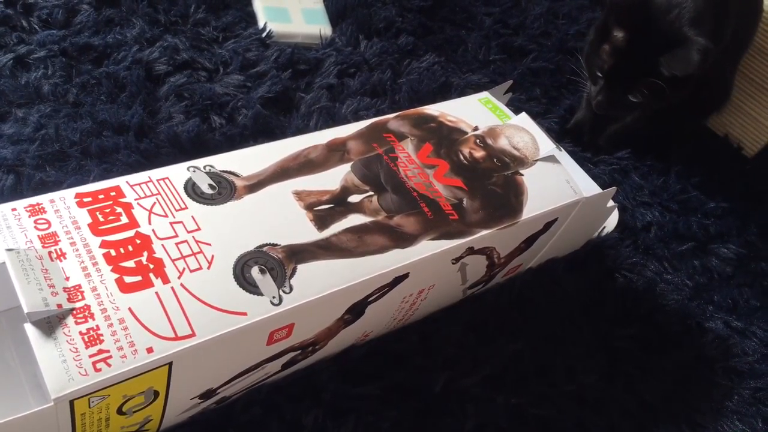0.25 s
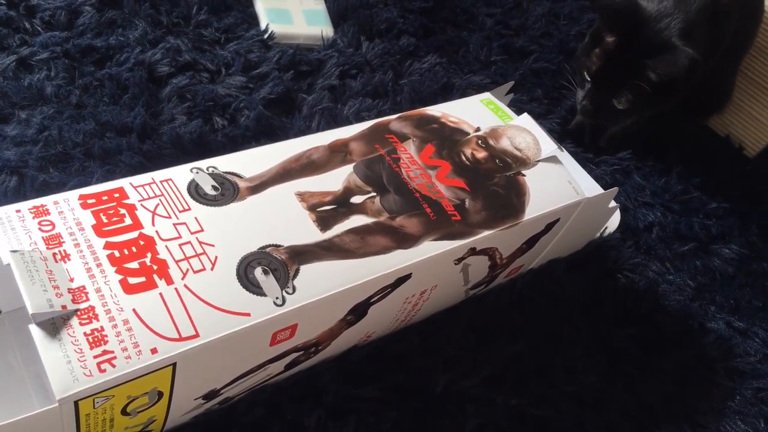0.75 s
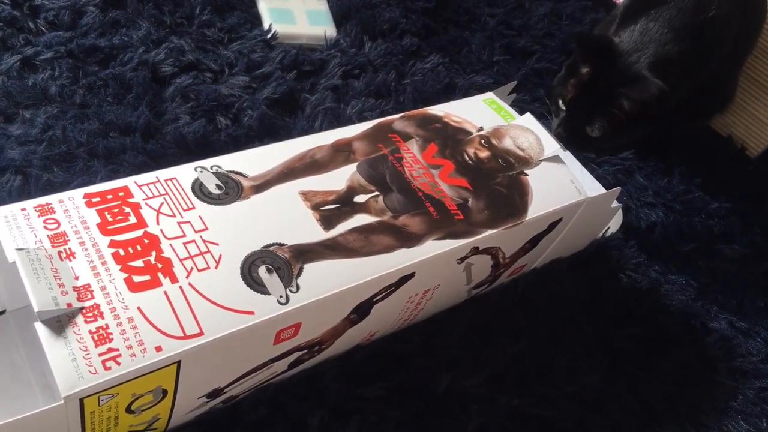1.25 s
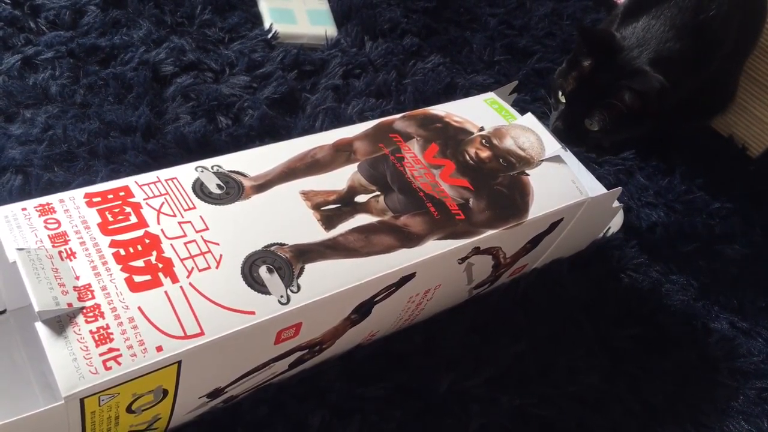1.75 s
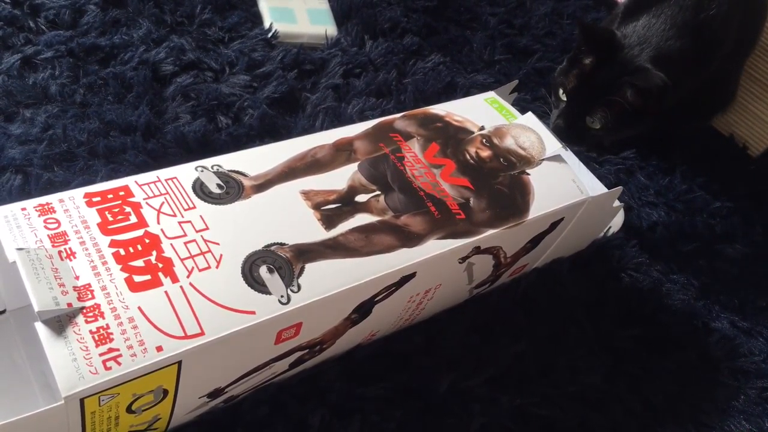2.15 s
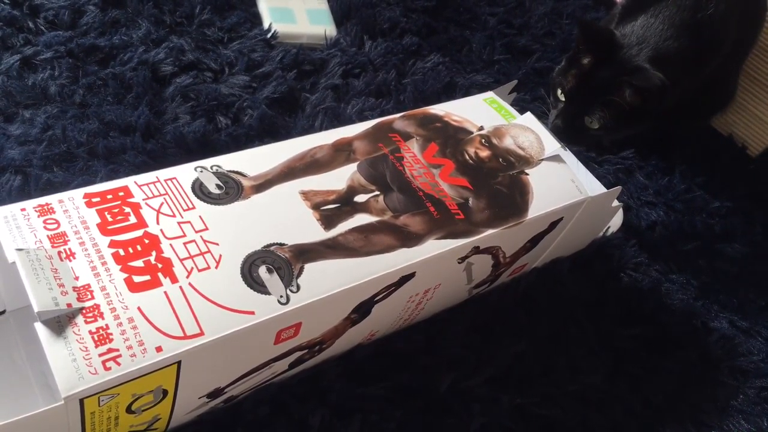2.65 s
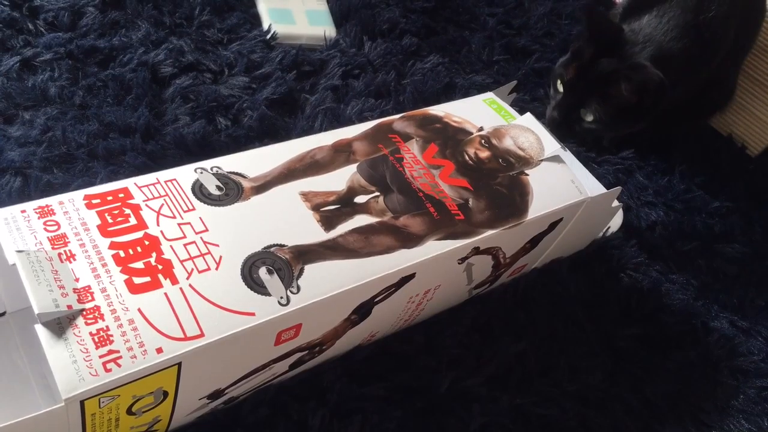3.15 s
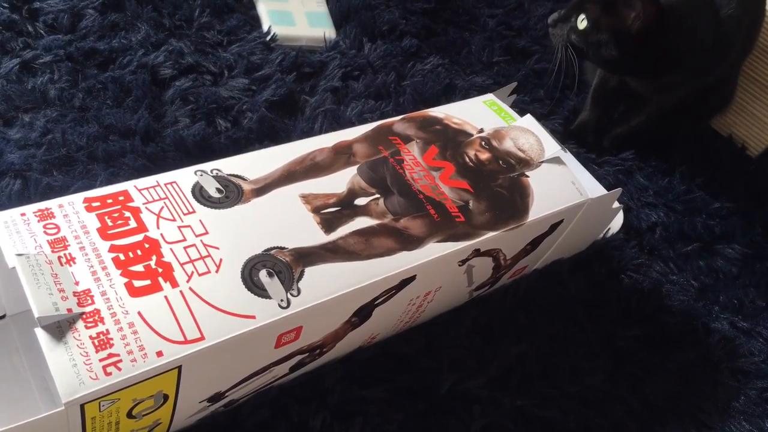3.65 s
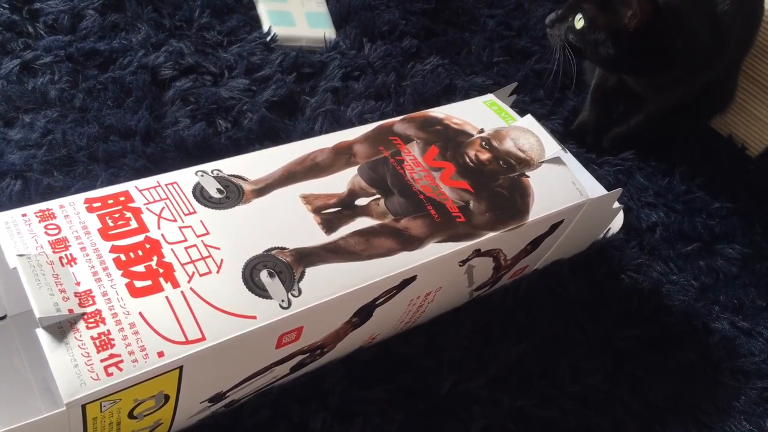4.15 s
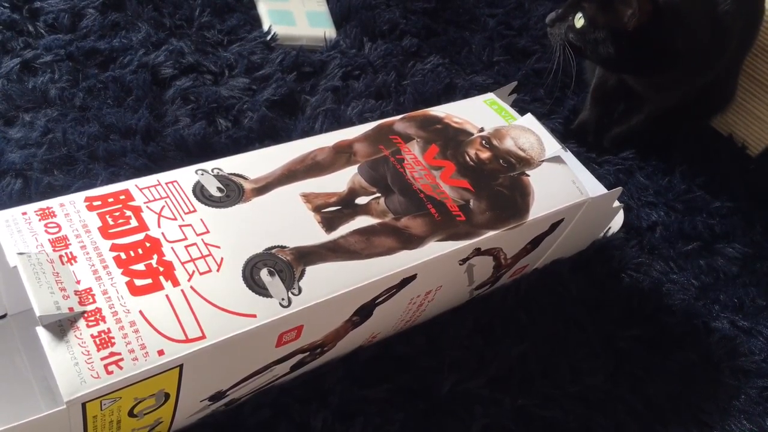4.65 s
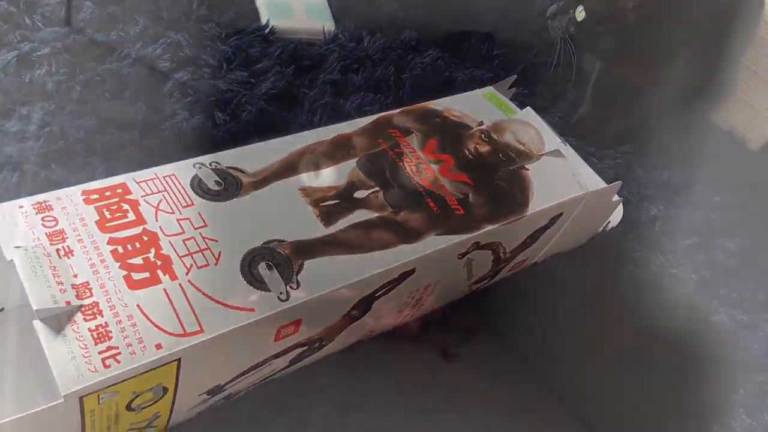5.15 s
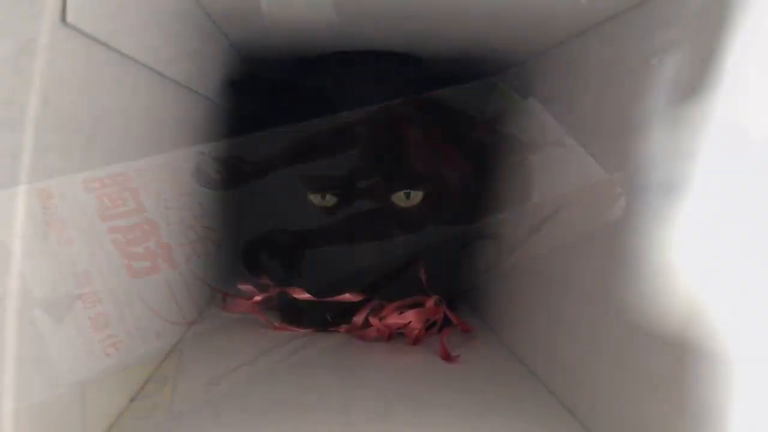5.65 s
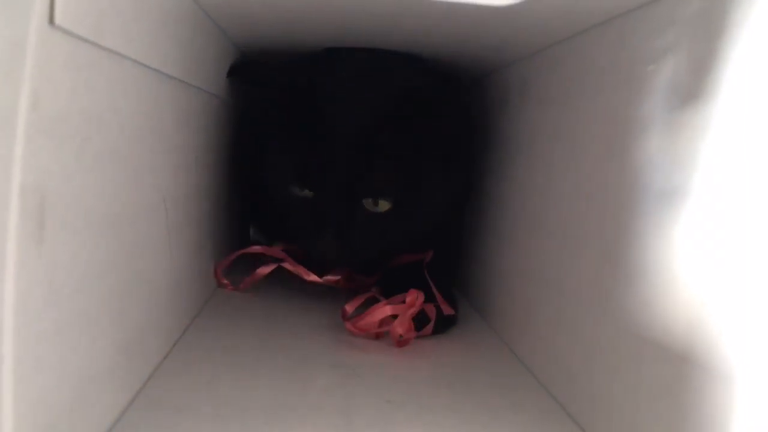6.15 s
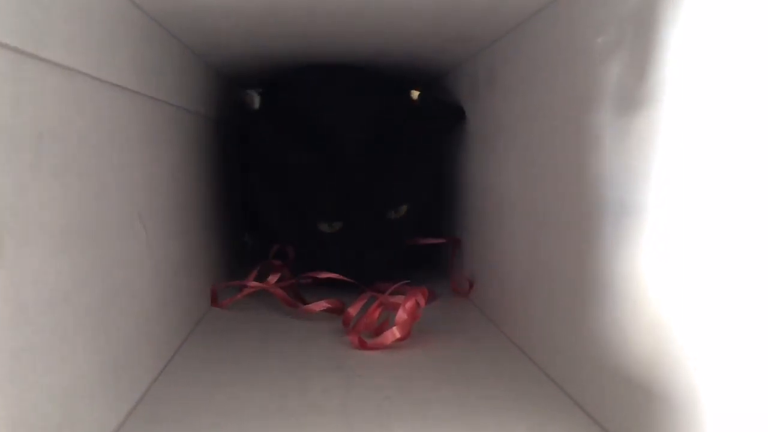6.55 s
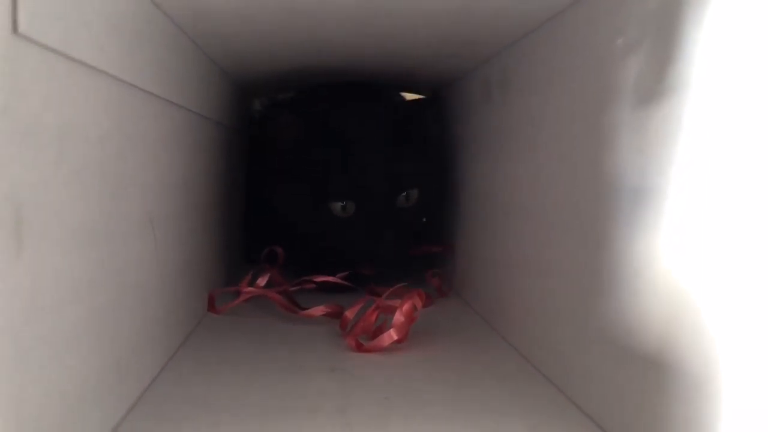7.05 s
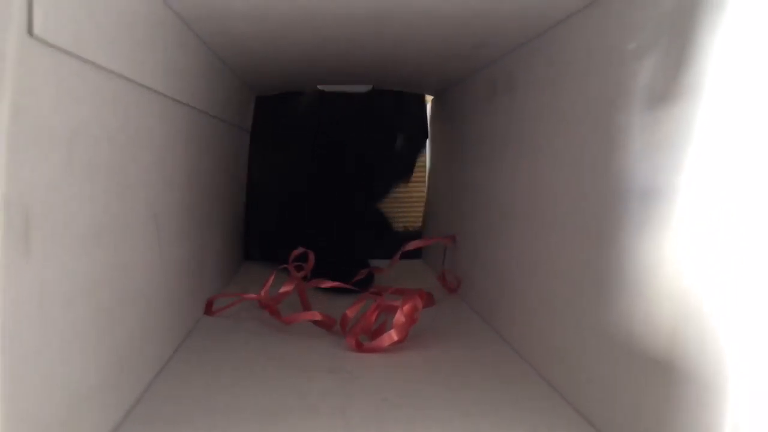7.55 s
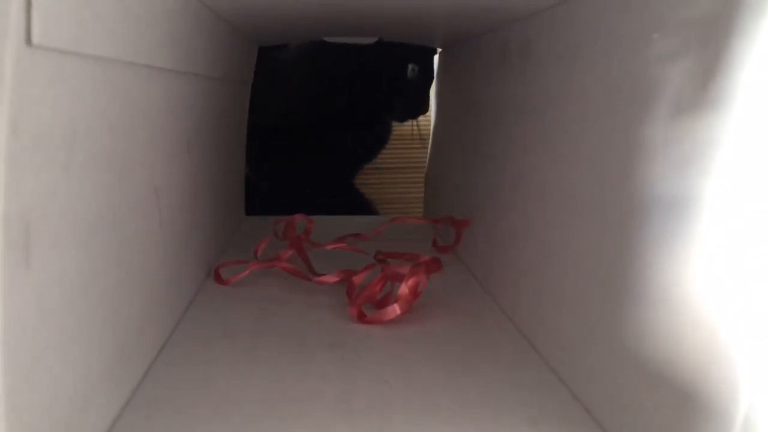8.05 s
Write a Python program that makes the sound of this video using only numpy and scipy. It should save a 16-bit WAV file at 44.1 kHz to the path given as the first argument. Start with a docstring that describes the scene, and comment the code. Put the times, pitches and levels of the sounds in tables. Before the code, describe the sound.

A quiet room has a steady low rumble and faint hiss. A cat picks at a cardboard flap with light, dry claw ticks and tiny scrapes, several between 0.4 and 1.3 seconds, then single ones near 2.4, 2.8, 3.5 and 4.3 seconds, the sharpest at 3.5. At about 4.8 seconds a soft bump brings in a hollow, booming rumble, as the microphone now listens from inside the box; a low wavering hum soon joins. From about 5.5 seconds fur rubs along the walls in close, uneven swells, with ribbon crinkles, small snaps and brief rasping scratches. The box rocks with two low thuds around 6.2 seconds, then a knock and another thud around 7.2; these are the loudest moments. A quick run of sharp snaps follows from 7.6 to 7.8 seconds as the cat backs out. The rubbing stops, and the rumble lingers until about 8.3 seconds.

```python
"""A cat and a cardboard box

In a quiet room, a cat picks at the flap of a long box: dry ticks and short claw scrapes.
Then we listen from inside the box, where the air booms. The cat pushes its head in, rubs its fur
along the walls, bumps them, crinkles a ribbon and backs out with a few sharp snaps."""
import sys
import numpy as np
from scipy import signal
from scipy.fft import rfft, irfft, next_fast_len
from scipy.io import wavfile
from scipy.ndimage import uniform_filter1d

SR = 44100
rng = np.random.default_rng(int(sys.argv[2]) if len(sys.argv) > 2 else 0)


def unload_wav(signal):
    """Save mono or channel-first audio to the path in sys.argv[1] as 16-bit WAV at rate SR, clipped to [-1, 1]."""
    wavfile.write(
        sys.argv[1],
        SR,
        np.round(np.clip(np.atleast_2d(signal).T, -1, 1) * 32767).astype(np.int16),
    )


N = 366030
TIME = np.arange(N) / SR

# The tone of a claw slipping on the flap: pitch_hz, level_db
CLAW_TONE = [(150, -27), (700, -4), (1100, 0), (1400, -7.5), (1800, -0.5), (2600, 3.5), (3000, -10.5),
             (3700, -3.5), (5100, -17), (6300, -14), (8700, -18), (10400, -29), (11500, -22.5),
             (17000, -51)]
# The notes of the flap and the wall: pitch_hz, level_db, ring_s (time to fade by 60 dB)
FLAP_NOTES = [(1724, 6, 0.026), (2440, 2.5, 0.013), (3330, 1.5, 0.028), (6300, 5, .007)]
WALL_NOTES = [(77.4, -4.5, .14), (130.7, 5, 0.07), (260, -2, 0.064), (352, 1.5, 0.069), (685, -0.5, 0.044),
              (809, -2.5, 0.049), (1165, 0.5, 0.03), (1636, -3, 0.032), (2460, -27, 0.048),
              (3430, -21, 0.087)]
# Plucks at the flap: start_s, level_db, skid_ms, slip_ms, brightness_db_per_octave, spot_pitch_hz
PLUCKS = [(.441, -56.5, 1.5, 4, -7, 2540), (.520, -58, 32.5, 2, 0.5, 1860),
          (0.79, -59.5, -1.5, 1.4, -4, 1660), (.843, -42.5, 8.5, 2.8, -0.5, 1740),
          (.856, -54, -1, 1.4, 4, 3400), (1.106, -51, 0, 7, 3, 3430), (1.1438, -47.5, 3.5, 2.2, 2, 1830),
          (1.2538, -44.5, 5, 5.6, 2, 1765), (1.261, -45.5, -2, 1.9, -2.5, 1900),
          (1.270, -57, 0, 1.5, 3, 6450), (2.3918, -45.5, 6, 1.1, 4.5, 6700),
          (2.805, -59, 22, 3.2, 0.5, 2510), (3.489, -53.5, -1, 1.5, -8, 1200),
          (3.5442, -38, 1, 3.1, -0.5, 4300), (4.2655, -48.5, 1, 4.7, -2, 2590),
          (4.8091, -46.5, 1, 1.8, 0.5, 6360), (5.018, -55, 2, 3.2, 5, 3320),
          (5.236, -48.5, 1.5, 6, 2.5, 2500)]

def claw_plucks():
    """A claw may skid first, then lets go of the flap, which rings and shakes the wall."""
    out = np.zeros(N)
    for start_s, db, skid_ms, slip_ms, brightness, spot_hz in PLUCKS:
        if skid_ms > 0:
            add(out, start_s - skid_ms / 1000, slip(CLAW_TONE, db - 7, skid_ms, brightness))
        add(out, start_s, slip(CLAW_TONE, db, slip_ms, brightness))
        # Notes near the pitch of the plucked spot ring loudest.
        flap = [(hz, db + level - 35 * abs(np.log2(hz / spot_hz)), ring_s)
                for hz, level, ring_s in FLAP_NOTES]
        add(out, start_s, ring(flap, rise_s=0.00012))
        nudges = rng.standard_normal((len(WALL_NOTES), 2))
        wall = [(hz * (1 + 0.019 * pitch_nudge), level + 1.54 * level_nudge, ring_s)
                for (hz, level, ring_s), (pitch_nudge, level_nudge) in zip(WALL_NOTES, nudges)]
        push_db = min(db + 0.5, -44)  # the push on the wall grows until the flap gives way
        add(out, start_s, gain_of(push_db) * ring(wall, rise_s=0.0029))
    return out + gain_of(-14.5) * echoes(out, delay_s=0.008, length_ratio=0.85)


# The tone of a snap or crinkle: pitch_hz, level_db
SNAP_TONE = [(200, -14), (1000, -1), (1500, 0.5), (2400, 6), (4000, 7.5), (5100, 3), (6200, 4), (7500, -2),
             (9000, -4.5), (10400, -12), (12000, -9), (17000, -18)]
# Claw snaps and ribbon crinkles inside the box: start_s, level_db, slip_ms, brightness_db_per_octave
SNAPS = [(5.481, -58, 1.8, 15), (5.562, -48, 3.3, -14), (5.634, -57, 4.4, 9), (5.86, -49, 2.8, 4.5),
         (5.877, -47, 1.8, 3), (5.952, -45.5, 5.6, 11), (5.9844, -37, 1.2, 9), (6, -44.5, 4.2, -10),
         (6.071, -49, 2, 11), (6.2029, -40, 3.4, -3), (6.354, -43.5, 5.8, -5), (6.365, -46, 4.5, 10),
         (6.6282, -46, 5.3, -7.5), (7.165, -52.5, 4.7, 0), (7.182, -55, 5, 0), (7.4981, -45.5, 6.1, -7),
         (7.654, -39.5, 4.2, -4), (7.6933, -39, 1.8, 9), (7.701, -39.5, 3.4, -6), (7.7503, -40, 1.6, -0.5),
         (7.7572, -40, 1.7, 0.5), (7.791, -36, 1.3, -2.5), (7.819, -49.5, 1, -3)]
# The notes of one cardboard panel: pitch_ratio, level_db, ring_ratio
PANEL_NOTES = [(.5, 1, .8), (.87, 2.5, 0.89), (1.08, 9.5, 0.52), (1.6, -6.5, 0.77), (2.7, -9, 0.32)]
# Paw knocks on a panel: start_s, level_db, pitch_hz, ring_s
KNOCKS = [(4.766, -39, 404, 0.016), (6.2043, -42.5, 580, 0.051), (7.1233, -27.5, 389, 0.041),
          (7.749, -35.5, 997, 0.051)]

def snaps_and_knocks():
    """Claws snap, ribbon crinkles and paws knock close by; the box answers with a short flutter."""
    out = np.zeros(N)
    for start_s, db, slip_ms, brightness in SNAPS:
        add(out, start_s, slip(SNAP_TONE, db, slip_ms, brightness))
    for start_s, db, hz, ring_s in KNOCKS:
        for pitch_ratio, level, ring_ratio in PANEL_NOTES:
            note = (hz * pitch_ratio, db + level, ring_s * ring_ratio)
            add(out, start_s, ring([note], rise_s=0.0046 / pitch_ratio ** 2))  # low notes build slowly
    return out + gain_of(-8.5) * echoes(out, delay_s=0.0036, length_ratio=0.24)


# Soft bumps against the box: start_s, level_db, pitch_hz, rise_s, ring_s
BUMPS = [(4.764, -35.5, 80.2, 0.0012, 0.48), (4.803, -33.5, 78, 0.014, 0.33),
         (5.233, -38, 89.5, 0.007, 0.34), (6.199, -26, 82.2, 0.028, 0.27),
         (6.299, -22.5, 86.4, 0.037, 0.21), (7.266, -22.5, 86.2, 0.022, 0.15)]

def bumps():
    """The whole box rocks on the carpet with a low thud."""
    out = np.zeros(N)
    for start_s, db, hz, rise_s, ring_s in BUMPS:
        add(out, start_s, ring([(hz, db, ring_s), (hz * 3.3, db - 13, ring_s / 2)], rise_s))
    return out


# How firmly the cat leans on the walls: time_s, level_db
LEANING = [(5.3, -81), (5.6, -66), (5.84, -64.5), (5.92, -57), (7.0, -59), (7.85, -64), (7.93, -85)]
# Shoves of the head, each a smooth rise and fall: peak_s, length_s, level_db, treble_db
SHOVES = [(5.935, 0.11, -56.5, 3), (6.022, 0.098, -48.5, -0.5), (6.145, 0.064, -54.5, -2),
          (6.33, 0.29, -58.5, 3.5), (6.55, 0.49, -58, -6), (6.84, 0.17, -52.5, -3), (7.275, 0.06, -51, -8),
          (7.31, .09, -59, 2), (7.44, 0.13, -58.5, 4), (7.56, 0.22, -53.5, 2.5), (7.71, 0.08, -51.5, -4),
          (7.85, 0.13, -59.5, -21)]

def cat_pressure():
    """Leaning and shoving add up to set how loud and how bright the rubbing is."""
    power = level_curve(LEANING) ** 2
    treble_power = power * gain_of(-1.5) ** 2
    for peak_s, length_s, db, treble_db in SHOVES:
        arch = gain_of(db) * np.cos(np.pi * np.clip((TIME - peak_s) / length_s, -0.5, 0.5))
        power += arch ** 2
        treble_power += (arch * gain_of(treble_db)) ** 2
    # The fur catches and slides unevenly.
    jitter_db = 1.07 * noise(lambda hz: -20 * np.log10(1 + (hz / 25) ** 2))
    return np.sqrt(power) * gain_of(jitter_db), 10 * np.log10(treble_power / power)


# The tone of fur on cardboard: pitch_hz, level_db
RUB_TONE = [(240, -12), (400, -8), (592, -3), (749, -7.5), (978, -2.5), (1360, -8.5), (2180, -9.5),
            (3030, -6), (3890, -4.5), (4850, -9), (7640, -17), (9080, -12), (10600, -15.5), (13400, -19.5),
            (17000, -23.5)]
# Pitches the long box boosts or cuts, like a tube: pitch_hz, width_hz, boost_db
TUBE_BANDS = [(633, 190, 1.5), (990, 99, 2.5), (2240, 440, 3), (3100, 110, -10), (4050, 990, -2),
              (9000, 1400, -1), (10500, 880, -7)]

def fur_rubbing(pressure, treble_db):
    """Fur hisses and fibres crackle along the box; the tone shifts with the spot being rubbed."""
    friction = rng.standard_normal(N) + gain_of(-5) * crackle(per_s=1100, spread_db=0)
    hz, times, spectrum = signal.stft(friction, SR, nperseg=512, noverlap=384)
    tone_db = (value_at(RUB_TONE, hz) + humps(TUBE_BANDS, hz))[:, None]
    # Random louder and softer patches, smoothed over time and then over pitch.
    patches = uniform_filter1d(rng.standard_normal(spectrum.shape), size=10, axis=1)
    patches_db = 1.7 * normalise(uniform_filter1d(patches, size=7, axis=0))
    # The nearest wall reflects the rub, with a delay that changes from shove to shove.
    wander = np.interp(times, np.transpose(SHOVES)[0], rng.standard_normal(len(SHOVES)))
    delay_s = 0.000494 * (1 + 0.087 * wander)
    reflection_db = 1.5 * np.cos(2 * np.pi * hz[:, None] * delay_s)
    # Each shove has its own treble level, making the rub brighter or duller.
    treble_share = value_at([(4500, 0), (9000, 0.95)], hz)[:, None]
    bright_db = treble_share * (np.interp(times, TIME, treble_db) + 4)
    spectrum *= gain_of(tone_db + patches_db + reflection_db + bright_db)
    hiss = normalise(signal.istft(spectrum, SR, nperseg=512, noverlap=384)[1][:N]) * pressure
    return hiss + gain_of(-14) * echoes(hiss, delay_s=0.0027, length_ratio=0.25)


# Pitches the cardboard boosts in a scrape: pitch_ratio, width_hz, boost_db
SCRAPE_BANDS = [(1, 527, 24.5), (1.75, 400, 14), (2.04, 500, 14.5), (2.9, 600, 4)]
# Claws and whiskers dragging on cardboard: start_s, length_s, level_db, pitch_hz
SCRAPES = [(0.798, .035, -67, 1880), (1.028, 0.073, -74, 3360), (5.945, 0.1, -56, 6550),
           (5.991, 0.083, -53, 3630), (6.621, 0.026, -51.5, 2000), (6.64, 0.049, -49, 2090),
           (6.812, 0.11, -62, 3370), (7.256, 0.08, -57, 2410), (7.522, 0.056, -58, 9300),
           (7.664, 0.017, -49, 5450), (7.693, 0.032, -51, 2200)]

def scrapes():
    """A dragged claw or whisker sticks and slips, making the cardboard rasp."""
    out = np.zeros(N)
    for start_s, length_s, db, pitch_hz in SCRAPES:
        bands = [(pitch_hz * ratio, width, boost) for ratio, width, boost in SCRAPE_BANDS]
        clicks = crackle(per_s=2500, spread_db=1)
        rasp = shape_tone(clicks, lambda hz: humps(bands, hz))[:round(length_s * SR)]
        add(out, start_s, gain_of(db) * normalise(rasp) * signal.windows.tukey(len(rasp), 0.5))
    return out


def ribbon(pressure, loops=4, crinkles_per_s=45):
    """Loops of ribbon on the box floor make tiny bright slips, louder as the cat presses."""
    out = np.zeros(N)
    for _ in range(loops):
        clicks = crackle(crinkles_per_s / loops, spread_db=6.5)
        crinkle = slip(SNAP_TONE, db=0, slip_ms=1.9, brightness=6)
        out += signal.fftconvolve(clicks, crinkle)[:N]
    return gain_of(-11.5) * normalise(out) * pressure


# How long echoes last at each pitch, before length_ratio shortens them: pitch_hz, ring_s
ECHO_FADES = [(100, 0.53), (700, 0.21), (2000, 0.2), (4000, 0.15), (12000, 0.12)]

def echoes(sound, delay_s, length_ratio):
    """Many small reflections blur into a tail whose high pitches die first."""
    size = SR // 2
    taps = rng.choice([-1., 1.], size) * (rng.random(size) < 0.1) * (TIME[:size] > delay_s)
    hz, times, spectrum = signal.stft(taps, SR, nperseg=256)
    ring_s = length_ratio * value_at(ECHO_FADES, hz)[:, None]
    tail = signal.istft(spectrum * gain_of(-60 * times / ring_s), SR, nperseg=256)[1]
    return signal.fftconvolve(sound, tail / np.linalg.norm(tail))[:N]


# The tone of the rumble inside the box: pitch_hz, level_db
BOOM_TONE = [(20, -25), (45, -6.5), (85, 1.5), (135, -2.5), (160, -8.5), (260, -11.5), (360, -17.5),
             (470, -24), (650, -26), (1000, -31.5), (1500, -33.5), (3000, -41), (8000, -51), (17000, -54)]
# Pitches the air in the box boosts: pitch_hz, width_hz, boost_db
AIR_BANDS = [(188.4, 13, 13), (303, 16, 8), (645, 114, 5.5), (968, 136, 8.5)]
# The rise and fall of a low hum: time_s, level_db
HUM_LEVELS = [(5.2, -82), (5.6, -52), (6.4, -51.5), (7.4, -47), (8.05, -51), (8.3, -60)]

def box_air(inside_s=4.745, rise_s=0.018, fade_db_per_s=2, hum_hz=53.5):
    """Handling rumble booms in the air of the box and slowly settles, over a wavering hum."""
    boom = noise(lambda hz: value_at(BOOM_TONE, hz) + humps(AIR_BANDS, hz))
    since_s = TIME - inside_s
    boom_gain = np.clip(since_s / rise_s, 0, 1) * gain_of(-47 - fade_db_per_s * since_s)
    waver = 0.11 * noise(lambda hz: value_at([(3, 0), (15, -60), (100, -140)], hz))
    hum = np.sqrt(2) * np.sin(2 * np.pi * hum_hz * TIME + waver) * (1 + waver)
    return boom * boom_gain + hum * level_curve(HUM_LEVELS)


# The tones of the steady room noise and of a soft rush: pitch_hz, level_db
ROOM_TONE = [(12, -62), (20, -19), (48, -14), (71, -4), (92, -2.5), (129, -11), (153, -16.5), (186, -17.5),
             (309, -22.5), (398, -32.5), (701, -34), (1230, -39), (1680, -41.5), (3130, -46.5),
             (17000, -55)]
RUSH_TONE = [(150, -7), (300, 0.5), (600, -1.5), (1050, 0.5), (1700, -5), (3000, -20), (6000, -34)]
# Narrow dips the microphone makes in the room noise: pitch_hz, width_hz, boost_db
MIC_DIPS = [(4930, 200, -6.5), (10400, 300, -6)]

def room():
    """A steady low rumble and hiss, with a soft rush that fades ever faster."""
    steady = noise(lambda hz: value_at(ROOM_TONE, hz) + humps(MIC_DIPS, hz))
    rush = noise(lambda hz: value_at(RUSH_TONE, hz))
    return gain_of(-54) * steady + gain_of(-66.5 - 5 * TIME ** 2) * rush


def slip(tone, db, slip_ms, brightness, size=4096):
    """A brief skid over fibres makes a burst of noise; brightness tilts it in dB per octave."""
    progress = TIME[:size] * 1000 / max(slip_ms, 0.4)
    burst = rng.standard_normal(size) * (1 - np.exp(-8 * progress)) * np.exp(-progress ** 2)
    hz = abs(np.fft.fftfreq(size, 1 / SR))
    tone_db = value_at(tone, hz) + brightness * np.log2(np.maximum(hz, 400) / 3000)
    # This filter rings only after the blow, never before it.
    surface = np.exp(np.conj(signal.hilbert(np.log(gain_of(tone_db)))))
    sound = np.fft.ifft(np.fft.fft(burst) * surface).real
    return gain_of(db) * sound / np.linalg.norm(sound) * np.sqrt(SR * (slip_ms + 1) / 2000)


def ring(notes, rise_s):
    """Pure notes that start softly and die away."""
    t = TIME[:SR // 2]
    sound = sum(gain_of(db - 60 * t / ring_s) * np.sin(2 * np.pi * hz * t) for hz, db, ring_s in notes)
    return sound * (1 - np.exp(-t / rise_s))


def crackle(per_s, spread_db):
    """Fibres catch and let go in random clicks; spread_db makes their sizes uneven."""
    sizes = gain_of(spread_db * np.minimum(rng.exponential(1, N), 4))
    return normalise(sizes * rng.choice([-1, 1], N) * (rng.random(N) < per_s / SR))


def noise(db_at_hz):
    """Random noise with the given tone."""
    return shape_tone(rng.standard_normal(N), db_at_hz)


def shape_tone(sound, db_at_hz):
    """Turns each pitch up or down, then normalises the result."""
    size = next_fast_len(N, real=True)
    gains = gain_of(db_at_hz(np.fft.rfftfreq(size, 1 / SR)))
    return normalise(irfft(rfft(sound, size) * gains, size)[:N])


def value_at(points, hz):
    """Reads between a table's rows, with octaves evenly spaced."""
    pitches, values = np.transpose(points)
    return np.interp(np.log(hz + 1), np.log(pitches + 1), values)


def humps(bands, hz):
    """Bell-shaped boosts or cuts, in dB."""
    return sum(db / (1 + (2 * (hz - centre) / width) ** 2) for centre, width, db in bands)


def level_curve(points):
    """A gain that glides from point to point, silent before and after."""
    times, db = np.transpose(points)
    return gain_of(np.interp(TIME, times, db, left=-200, right=-200))


def gain_of(db):
    """Turns decibels into a multiplier."""
    return 10 ** (np.asarray(db) / 20)


def normalise(sound):
    """Scales a sound to an average (rms) size of 1."""
    return sound / np.sqrt(np.mean(sound ** 2) + 1e-20)


def add(mix, start_s, sound):
    """Mixes a sound in at start_s."""
    part = mix[round(start_s * SR):][:len(sound)]
    part += sound[:len(part)]


def scene():
    """The room, the box and the cat together in one channel."""
    pressure, treble_db = cat_pressure()
    mix = room() + box_air() + claw_plucks() + snaps_and_knocks() + bumps()
    mix += fur_rubbing(pressure, treble_db) + ribbon(pressure) + scrapes()
    return mix[None]


def record(dry):
    """The microphone loses the very highest treble."""
    low_pass = signal.firwin(511, cutoff=17250, window=("kaiser", 9), fs=SR)
    return signal.oaconvolve(dry, low_pass[None], "same")


dry = scene()
out = record(dry)
unload_wav(out)
```